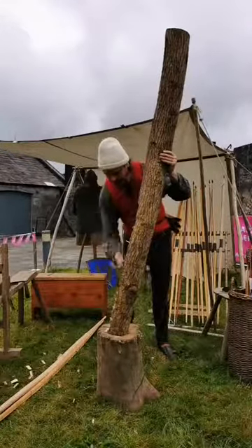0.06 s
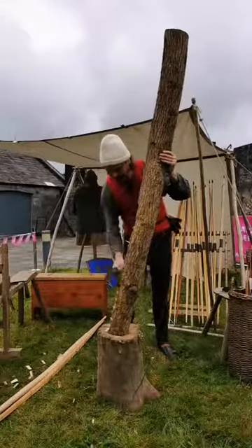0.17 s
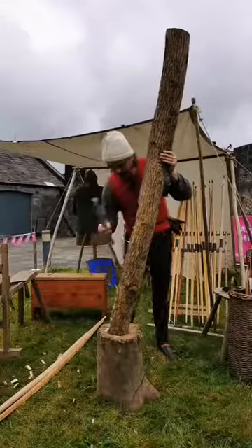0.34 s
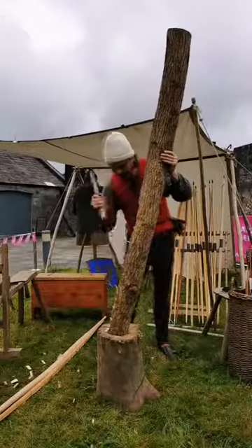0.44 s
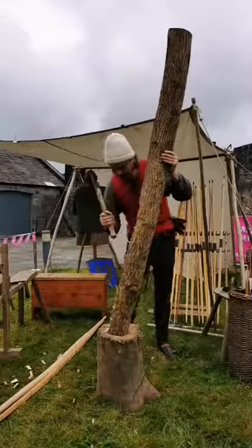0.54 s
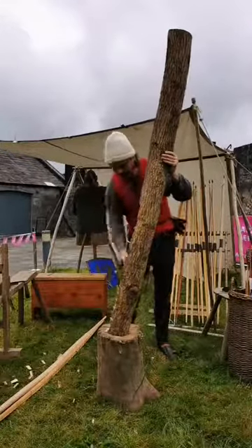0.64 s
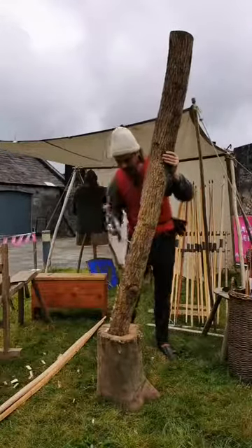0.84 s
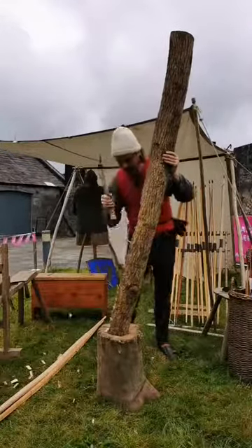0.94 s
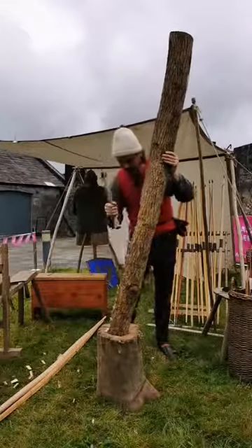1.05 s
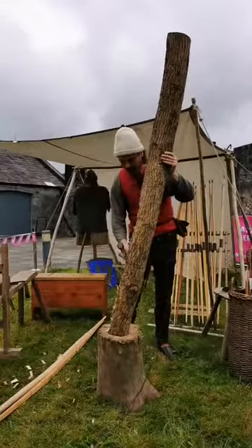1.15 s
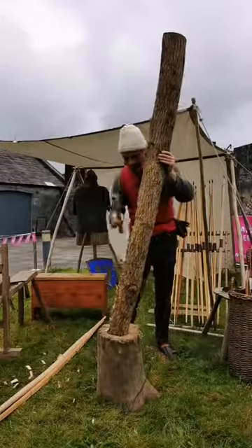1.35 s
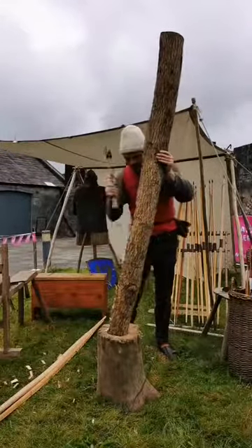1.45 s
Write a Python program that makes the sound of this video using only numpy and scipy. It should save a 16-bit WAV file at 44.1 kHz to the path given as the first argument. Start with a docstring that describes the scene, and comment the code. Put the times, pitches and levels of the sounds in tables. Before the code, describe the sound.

Three crisp axe strikes on wood, about half a second apart, in an open yard.

```python
"""Three strokes of a side axe into a wooden stave on a chopping block in a grassy yard.
Each stroke is a short crunch of fibres (coloured noise), a knock (decaying stave modes) and a low
thud from the block; a noise tail and a blurred echo cluster make the yard and the buildings answer.
Chips tick as small noise bursts, and the steel blade clinks once as it comes free (decaying sines).
Behind lie a faint noise background, a sleeve swish before each stroke and thin far-off squeaks."""
import sys
import numpy as np
from scipy import signal
from scipy.fft import rfft, irfft
from scipy.io import wavfile
from scipy.ndimage import uniform_filter1d

SR = 44100
rng = np.random.default_rng(int(sys.argv[2]) if len(sys.argv) > 2 else 0)


def store_pcm(level_fs):
    """Save levels as 16-bit WAV."""
    pcm = np.round(np.clip(level_fs, -1, 1) * 32767).astype(np.int16)
    wavfile.write(sys.argv[1], SR, np.atleast_2d(pcm).T)


N = 66150  # 1.5 s


def amp(db):
    """Decibels to gain."""
    return 10 ** (np.asarray(db) / 20)


def unit(x):
    """Scales to rms 1."""
    return x / np.sqrt(np.mean(x ** 2) + 1e-20)


def read(points, hz):
    """Interpolates a table on a log-frequency axis."""
    f, value = np.transpose(points)
    return np.interp(np.log(hz + 1), np.log(f + 1), value)


def add(mix, start_s, sound):
    """Mixes a sound in at a time, cut at the end of the mix."""
    part = mix[max(round(start_s * SR), 0):][:len(sound)]
    part += sound[:len(part)]


def seconds(n):
    """Time axis of n samples."""
    return np.arange(n) / SR


def sine(hz, t):
    """Sine tone from phase zero."""
    return np.sin(2 * np.pi * hz * t)


def ramp(t, rise_s):
    """Linear rise to full level."""
    return np.minimum(t / rise_s, 1)


def build_up(t, rise_s):
    """Smooth rise, quadratic at first, then levelling off."""
    return 1 - np.exp(-(t / rise_s) ** 2)


def fade(age, t60_s):
    """Exponential decay by 60 dB in t60_s; full level while age is negative."""
    return np.exp(-np.log(1000) * np.maximum(age, 0) / t60_s)


def smooth_noise(n, size):
    """Slow random curve: noise under a moving average, at rms 1."""
    return unit(uniform_filter1d(rng.standard_normal(n), size=size))


def colour(x, points, tilt_db_per_octave=0):
    """Gives noise a spectrum, at rms 1."""
    hz = np.fft.rfftfreq(len(x), 1 / SR)
    octaves = np.log2((hz + 100) / 2000)
    gain_db = read(points, hz) + tilt_db_per_octave * octaves
    return unit(irfft(rfft(x) * amp(gain_db), len(x)))


def die_away(x, age, t60s):
    """Splits x into overlapping bands and lets each fade at its own speed."""
    hz, spectrum = np.fft.rfftfreq(len(x), 1 / SR), rfft(x)
    centres = [f for f, _ in t60s]
    out = np.zeros(len(x))
    for share, (_, t60_s) in zip(np.eye(len(t60s)), t60s):
        weight = read(list(zip(centres, share)), hz)
        out += irfft(spectrum * weight, len(x)) * 1e-3 ** (age / t60_s)
    return out


# Outdoor background spectrum. Each row: frequency in Hz, relative level in dB.
AIR_SPECTRUM = [(20, 0), (45, 2.5), (70, -7), (140, -10), (220, -8), (400, -9), (750, -9.5), (970, -5),
                (1200, -11), (1600, -16), (2200, -21), (3500, -29.5), (6000, -34), (9000, -42),
                (15000, -48)]
AIR_RMS_DB, AIR_PATCH_DB = -64, 3.5


def air():
    """Faint outdoor noise whose level drifts in time-frequency patches."""
    hz, _, z = signal.stft(rng.standard_normal(N), SR, nperseg=2048, noverlap=1536)
    patches = uniform_filter1d(rng.standard_normal(z.shape), size=12, axis=0)
    patches = unit(uniform_filter1d(patches, size=8, axis=1))
    z = z * amp(read(AIR_SPECTRUM, hz)[:, None] + AIR_PATCH_DB * patches)
    noise = signal.istft(z, nperseg=2048, noverlap=1536)[1][:N]
    return amp(AIR_RMS_DB) * unit(noise)


# Faint far-off squeaks. Each row: start in seconds, length in seconds, start and end pitch in Hz, level in dB.
FAR_SQUEAKS = [(0.094, 0.05, 1346, 1328, -63), (0.55, 0.01, 6010, 6060, -72.5),
               (1.206, 0.011, 1397, 1370, -60.5), (1.415, 0.11, 1680, 1890, -64.5)]
SQUEAK_WAVER = .02  # rms, as a fraction of the pitch


def squeaks():
    """Thin gliding sines with a randomly wavering pitch."""
    out = np.zeros(N)
    for start_s, length_s, start_hz, end_hz, db in FAR_SQUEAKS:
        u = np.linspace(0, 1, round(length_s * SR))
        waver = smooth_noise(SR, 120)[:len(u)]
        hz = (start_hz + (end_hz - start_hz) * u) * (1 + SQUEAK_WAVER * waver)
        swell = np.sin(np.pi * np.sqrt(u))
        add(out, start_s, amp(db) * swell * np.sin(2 * np.pi * np.cumsum(hz) / SR))
    return out


# Sleeve cloth spectrum. Each row: frequency in Hz, relative level in dB.
SWISH_SPECTRUM = [(30, 9), (60, 6.5), (100, -4), (300, 8.5), (700, -5), (2000, -13), (6000, -22),
                  (14000, -45)]
# Swish level of each stroke in dB.
SWISH_LEVELS_DB = [-70.5, -59.5, -66.5]
SWISH_LEAD_S, SWISH_WIDTH_S = 0.037, 0.069


def sleeve():
    """Cloth noise swells on each downswing and peaks just before the stroke lands."""
    t = seconds(N)
    level = np.zeros(N)
    for (start_s, *_), db in zip(STROKES_TABLE, SWISH_LEVELS_DB):
        level += amp(db) * np.exp(-((t - start_s + SWISH_LEAD_S) / SWISH_WIDTH_S) ** 2)
    return level * colour(rng.standard_normal(N), SWISH_SPECTRUM)


# Yard reverberation spectrum. Each row: frequency in Hz, relative level in dB.
YARD_SPECTRUM = [(100, -15.5), (420, -19), (620, -5.5), (850, -6), (1080, -5.5), (1350, -3), (1800, -8.5),
                 (3500, 2.5), (7400, 2), (9000, -8), (15000, -11.5)]
# Yard reverberation decay. Each row: frequency in Hz, t60 in seconds.
YARD_DECAY = [(100, .25), (1000, 0.55), (3000, 0.46), (7000, 0.38), (15000, .3)]
YARD_RISE_S = .015


def yard(x, tilt_db_per_octave):
    """Scattered echoes of the open yard: convolution with a decaying noise tail of unit energy."""
    t = seconds(SR * 2 // 3)
    noise = colour(rng.standard_normal(len(t)), YARD_SPECTRUM, tilt_db_per_octave)
    tail = die_away(noise, t, YARD_DECAY) * ramp(t, YARD_RISE_S)
    return signal.fftconvolve(x, tail / np.linalg.norm(tail))


# Building echo spectrum. Each row: frequency in Hz, relative level in dB.
WALL_SPECTRUM = [(200, -20), (480, -9.5), (640, -1.5), (780, 12), (900, 1), (1070, -8), (1320, 7),
                 (1550, -16), (3000, 0.5), (6000, -5.5), (10000, -17)]
WALL_DELAY_S, WALL_SPREAD_S = 0.11, 0.038


def walls(x):
    """Buildings throw back a blurred, hollow copy: convolution with a bell-shaped noise cluster."""
    t = seconds(SR // 3)
    cluster = np.exp(-((t - WALL_DELAY_S) / WALL_SPREAD_S) ** 2)
    echo = colour(rng.standard_normal(len(t)), WALL_SPECTRUM) * cluster
    return signal.fftconvolve(x, echo / np.linalg.norm(echo))


SMALL_RISE_S = .001  # chips and blade


def tick(db, spectrum, t60_s):
    """Small decaying noise burst: a splinter snaps or lands, or wood touches the blade."""
    t = seconds(SR // 4)
    burst = colour(rng.standard_normal(len(t)), spectrum)
    return amp(db) * burst * fade(t, t60_s) * ramp(t, SMALL_RISE_S)


# Loose chips and splinters. Each row: start in seconds, level in dB.
CHIP_EVENTS = [(0.0779, -59), (.597, -64.5), (.613, -63), (.676, -68), (.709, -73), (.816, -52),
               (0.849, -52.5), (.989, -62.5), (1.098, -56.5), (1.117, -64.5), (1.3257, -39.5), (1.333, -51),
               (1.343, -46.5), (1.395, -57)]
# Chip spectrum. Each row: frequency in Hz, relative level in dB.
CHIP_SPECTRUM = [(200, -7), (1300, -2), (2100, 2), (3200, -2), (5000, -7.5), (7500, -10.5), (10000, -39),
                 (15000, -40)]
CHIP_T60_S = .04


def chips():
    """Splinters tick, each a fresh burst of one spectrum."""
    out = np.zeros(N)
    for start_s, db in CHIP_EVENTS:
        add(out, start_s, tick(db, CHIP_SPECTRUM, CHIP_T60_S))
    return out


# Steel blade modes. Each row: frequency in Hz, level in dB, t60 in seconds.
BLADE_MODES = [(627.6, -48.5, 0.14), (865, -49, .1), (1623, -60.5, 0.25), (2236, -56, 0.284),
               (3528, -32.5, 0.068), (3550, -51, 0.097), (5390, -53.5, 0.25)]
# Spectrum of wood touching the blade. Each row: frequency in Hz, relative level in dB.
CLINK_SPECTRUM = [(300, -27), (1500, 1), (2800, 4), (3600, -8.5), (4700, -7.5), (5700, 14.5), (6400, 2.5),
                  (7500, -8), (11000, -18.5), (15000, -38)]
CLINK_START_S, CLINK_TICK_DB, CLINK_TICK_T60_S = .8872, -40, 0.043


def clink():
    """The blade is tapped as it leaves the cut, and its modes ring down."""
    t = seconds(SR // 2)
    ring = sum(amp(db) * fade(t, t60_s) * sine(hz, t) for hz, db, t60_s in BLADE_MODES)
    ring *= ramp(t, SMALL_RISE_S)
    add(ring, 0, tick(CLINK_TICK_DB, CLINK_SPECTRUM, CLINK_TICK_T60_S))
    return ring


THUD_HZ, THUD_RISE_S, THUD_T60_S = 110, .014, 0.062


def block_thud():
    """The chopping block answers with one low mode that rises, then decays."""
    t = seconds(SR // 3)
    return sine(THUD_HZ, t) * ramp(t, THUD_RISE_S) * fade(t - THUD_RISE_S, THUD_T60_S)


# Crunch spectrum. Each row: frequency in Hz, relative level in dB.
CRUNCH_SPECTRUM = [(100, -28), (190, -24.5), (330, -9), (600, -3), (1300, 5), (2200, 1), (4400, -6.5),
                   (6800, -10), (8200, -20.5), (12000, -28.5), (15000, -34.5)]
# Crunch decay. Each row: frequency in Hz, t60 in seconds.
CRUNCH_DECAY = [(100, .07), (500, 0.11), (1500, .07), (3500, 0.023), (8000, 0.026), (15000, 0.021)]
CRUNCH_RISE_S, GRAIN_DB = 0.00093, 4


def fibre_crunch(length_s, tilt_db_per_octave, top_hz):
    """Fibres break as grainy noise, held for length_s; then each band dies away."""
    t = seconds(SR // 3)
    grains = amp(GRAIN_DB * smooth_noise(len(t), 24))
    fibres = colour(grains * rng.standard_normal(len(t)), CRUNCH_SPECTRUM, tilt_db_per_octave)
    fibres = signal.lfilter(*signal.butter(2, top_hz, fs=SR), fibres)
    held = die_away(fibres, np.maximum(t - length_s, 0), CRUNCH_DECAY)
    return build_up(t, CRUNCH_RISE_S) * held


# Stave modes; each stroke lands elsewhere and wakes them differently.
# Each row: frequency in Hz, t60 in seconds, relative level in dB in strokes 1, 2 and 3.
STAVE_MODES = [(285, 0.11, -35, -27.5, -29), (431, 0.039, -36.5, -29, -19.5),
               (524, 0.099, -35.5, -31.5, -28.5), (648.8, 0.095, -14, -17, -15),
               (868.5, 0.068, -13.5, -17, -13.5), (1072, .05, 0.5, -7, -9),
               (1281.6, 0.042, -12.5, -15.5, -1.5), (1533.6, 0.012, -14, -4.5, -12),
               (1731, 0.04, -23, -15.5, -23), (1897.6, 0.016, -20, -19, -11.5),
               (2267, 0.01, -35, -25.5, -19), (2858, 0.021, -30.5, -24.5, -15), (3475, .025, -35, -28, -12),
               (3926, .02, -22.5, -33.5, -17), (4402, 0.013, -34.5, -24, -13),
               (5865, 0.02, -42.5, -23.5, -23), (6460, 0.0084, -41, -24.5, -35)]
BITE_S = .0018  # build-up of the force


def stave_knock(index, drive_s):
    """The blade drives the stave's modes for drive_s; then each rings down."""
    t = seconds(SR // 3)
    knock = np.zeros(len(t))
    for k, (hz, t60_s, *levels_db) in enumerate(STAVE_MODES):
        sign = (-1) ** k
        knock += sign * amp(levels_db[index]) * fade(t - drive_s, t60_s) * sine(hz, t)
    return knock * build_up(t, BITE_S)


def stroke(index, knock_db, crunch_db, length_s, tilt_db_per_octave, top_hz, thud_db, drive_s):
    """One axe blow: (crunch of the fibres, wood of stave and block)."""
    crunch = amp(crunch_db) * fibre_crunch(length_s, tilt_db_per_octave, top_hz)
    wood = amp(knock_db) * stave_knock(index, drive_s) + amp(thud_db) * block_thud()
    return crunch, wood


# Axe strokes. Each row: start in seconds, knock gain in dB, crunch level in dB, crunch length in seconds,
# crunch tilt in dB per octave, crunch top in Hz, thud level in dB, drive in seconds, yard gain in dB,
# yard tilt in dB per octave, wall echo gain in dB.
STROKES_TABLE = [(0.2134, -4, -19.5, 0.0063, -2, 8500, -46, 0.0046, -24.5, 1.5, -42.5),
                 (0.7508, -2, -15.5, 0.0052, -1, 14000, -38.5, 0.005, -26.5, -1.5, -39.5),
                 (1.2624, -4, -13.5, 0.0038, -2.5, 13260, -45.5, 0.0031, -23.5, 0.5, -50)]
KNOCK_SEND_DB, SMALL_SEND_DB = -7.5, -28  # shares of knock and small sounds that reach the yard


def scene():
    """Strokes with their echoes, small sounds and the background."""
    out = air() + sleeve()
    for index, (start_s, *blow, yard_db, yard_tilt, wall_db) in enumerate(STROKES_TABLE):
        crunch, wood = stroke(index, *blow)
        add(out, start_s, crunch + wood)
        add(out, start_s, amp(yard_db) * yard(crunch + amp(KNOCK_SEND_DB) * wood, yard_tilt))
        add(out, start_s, amp(wall_db) * walls(crunch + wood))
    small = squeaks() + chips()
    add(small, CLINK_START_S, clink())
    small_echo = amp(SMALL_SEND_DB) * yard(small, 0)[:N]
    return (out + small + small_echo)[None]


CEILING, EDGE_HZ = .85, 15600


def record(dry):
    """Rounds off the loudest peaks, then low-passes at EDGE_HZ."""
    rounded = dry / (1 + (dry / CEILING) ** 4) ** (1 / 4)
    lowpass = signal.firwin(255, EDGE_HZ, window=("kaiser", 9), fs=SR)
    return signal.oaconvolve(rounded, lowpass[None], "same")


dry = scene()
out = record(dry)
store_pcm(out)
```